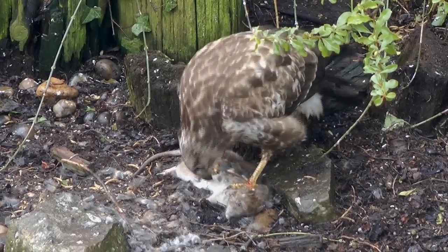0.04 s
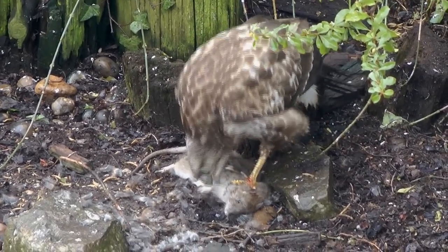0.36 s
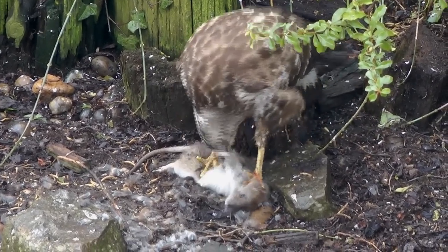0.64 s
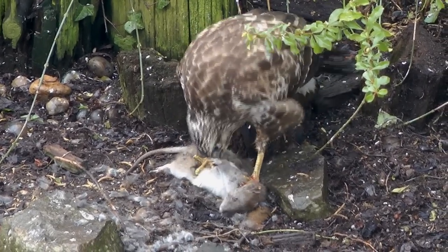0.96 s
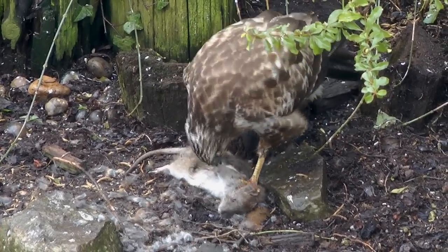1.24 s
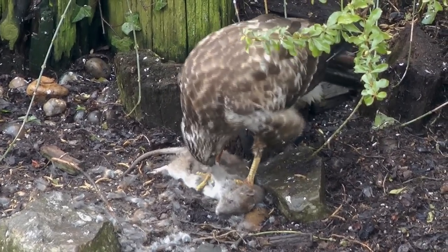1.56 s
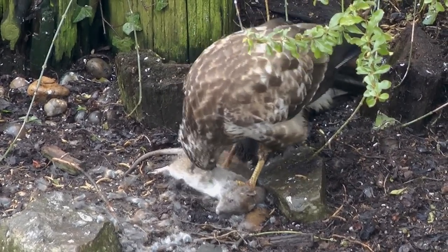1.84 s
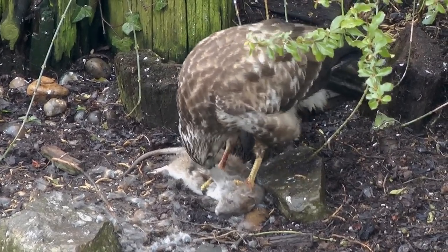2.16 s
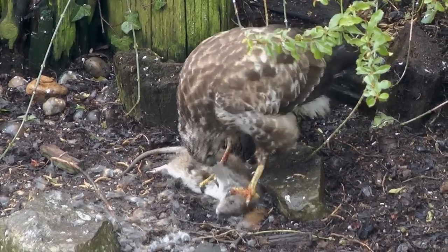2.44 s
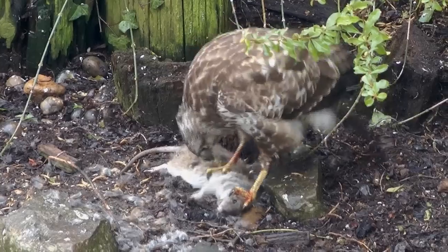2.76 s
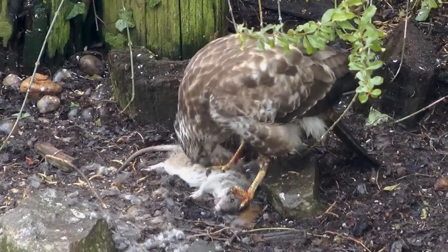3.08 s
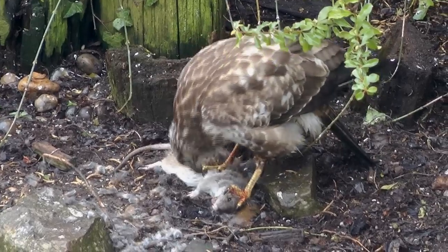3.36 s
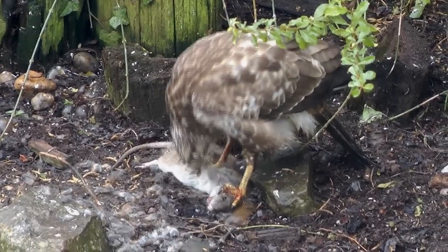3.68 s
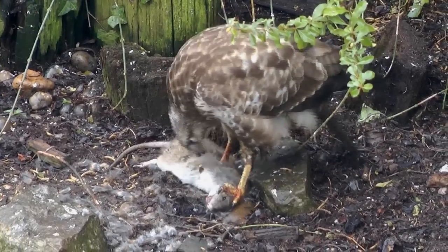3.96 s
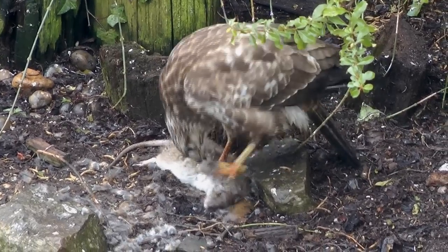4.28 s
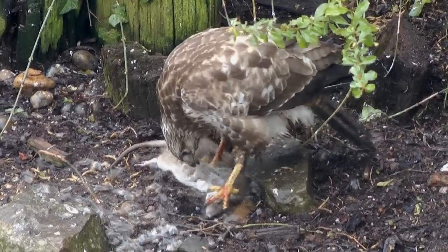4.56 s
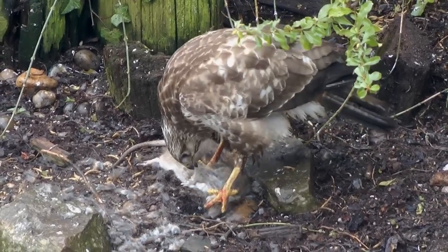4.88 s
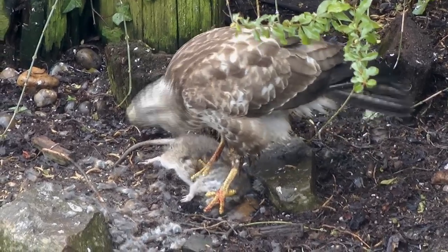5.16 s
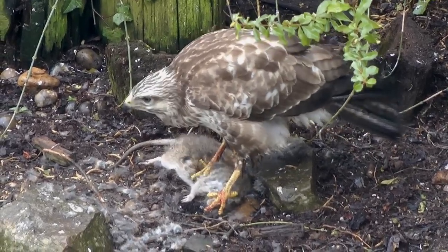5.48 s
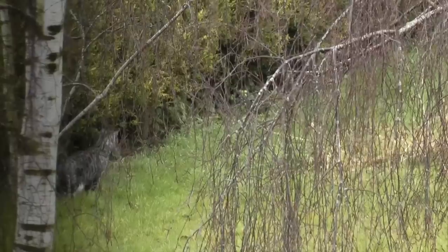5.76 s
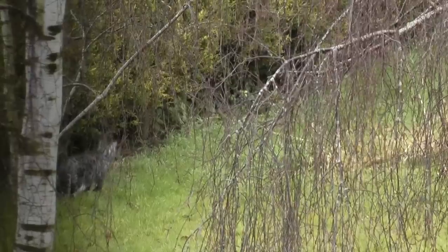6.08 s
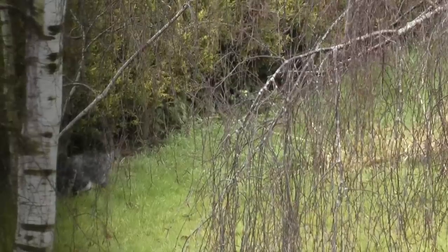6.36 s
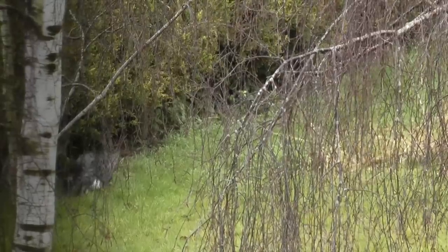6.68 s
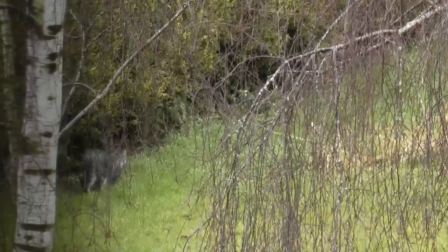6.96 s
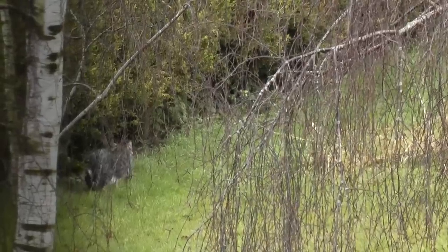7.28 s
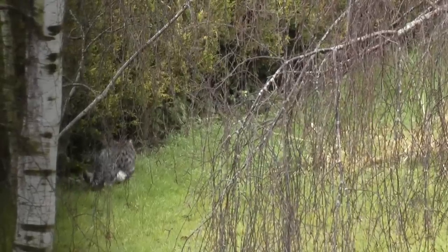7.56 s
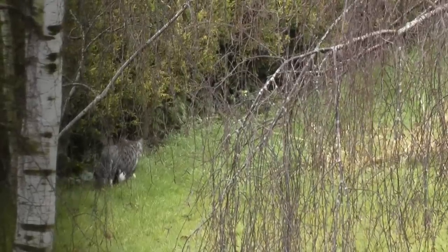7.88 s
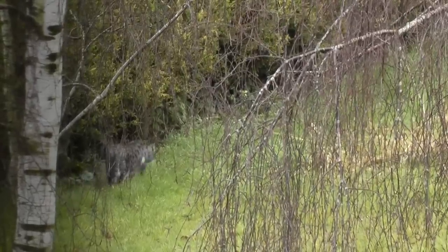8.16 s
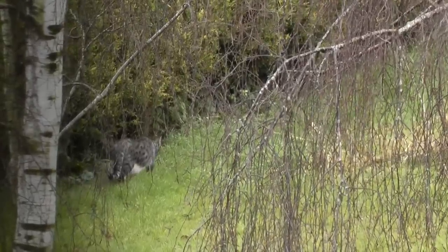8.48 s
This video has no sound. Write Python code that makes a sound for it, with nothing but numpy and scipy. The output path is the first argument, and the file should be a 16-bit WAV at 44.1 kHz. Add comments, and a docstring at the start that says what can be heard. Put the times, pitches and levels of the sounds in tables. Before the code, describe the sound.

A small songbird close to the microphone sings quick, bright, sweeping whistles for the first few seconds, while a second bird adds a brief high rasping note. The near song stops, and farther birds carry on with thin chirps, trills and a short flurry of falling notes. A low murmur of distant traffic and a faint hiss run underneath in the garden, with a soft microphone bump and two tiny dry clicks.

```python
"""A near songbird whistles sweeping phrases in a garden, often with both sides of its syrinx at once.
A second bird adds a high rasping loop; others answer from the trees over a low murmur of far traffic.
Each side of a syrinx is an oscillator that gives a nearly pure tone of gliding pitch.
Fences reflect the song and foliage scatters it into reverberation.
There is one soft bump on the microphone, and two short dry clicks."""
import sys
import numpy as np
from scipy import signal
from scipy.fft import rfft, irfft
from scipy.io import wavfile
from scipy.ndimage import uniform_filter1d

SR = 44100
rng = np.random.default_rng(int(sys.argv[2]) if len(sys.argv) > 2 else 0)


def master_out(mix):
    """Clip the mix to full scale and print it as 16-bit PCM to the path in sys.argv[1]."""
    frames = np.transpose(np.atleast_2d(mix))
    ceiling = np.clip(frames, -1, 1)
    pcm = np.round(ceiling * 32767).astype(np.int16)
    wavfile.write(sys.argv[1], SR, pcm)


N = 380583
TIME = np.arange(N) / SR


def from_db(db):
    """Amplitude ratio of a level in decibels."""
    return 10 ** (np.asarray(db) / 20)


def pan(left_db):
    """Level difference between the ears: left and right gains."""
    return from_db(np.array([[left_db], [-left_db]]) / 2)


def at_hz(points, hz):
    """Interpolation of a spectrum on a log-frequency axis."""
    point_hz, value = np.transpose(points)
    return np.interp(np.log(hz + 1), np.log(point_hz), value)


def add(track, start_s, sound):
    """Superposition: a sound joins the track at its moment."""
    i = int(np.clip(start_s * SR, 0, N))
    track[i:i + len(sound)] += sound[:N - i]


def drift(n, per_s):
    """Random modulation: straight lines between Gaussian values."""
    knots = rng.standard_normal(400)
    return np.interp(np.arange(n) * per_s / SR, np.arange(len(knots)), knots)


# Likeness of left and right in the open air: frequency_hz, correlation
COHERENCE = [(60,1),(280,0.76),(700,0.82),(6000,.8),(12000,1)]
def air_noise(spectrum):
    """Partial coherence: mid and side noise form a coloured stereo field of unit power."""
    hz = np.arange(N // 2 + 1) * SR / N
    mid, side = rfft(rng.standard_normal((2, N)))
    alike = np.clip(at_hz(COHERENCE, hz), 0, 1)
    stereo = np.sqrt(1 + alike) * mid + np.sqrt(1 - alike) * side * [[1], [-1]]
    roll_off = 1 + (hz / spectrum[-1][0] / 2) ** 4
    noise = irfft(from_db(at_hz(spectrum, hz)) / roll_off * stereo, N)
    return noise / np.sqrt(np.mean(noise ** 2))


# Spectra of far traffic and of open-air hiss: frequency_hz, relative_density_db
TRAFFIC_SPECTRUM = [(30,-7),(45,-15),(70,3),(90,-8),(150,0),(205,-7.5),(300,-8.5),(420,-16),(600,-10.5),(770,-5.5),(950,-9.5),(1300,-12),(1600,-17.5),(2000,-18),(5000,-52)]
HISS_SPECTRUM = [(3000,20),(6000,10.5),(9500,3),(13000,7)]
def traffic_and_air():
    """Stationary noise: a low murmur of traffic under a fainter hiss."""
    return from_db(-54.5) * air_noise(TRAFFIC_SPECTRUM) + from_db(-62.5) * air_noise(HISS_SPECTRUM)


# Tones of far machinery: pitch_hz, level_db
HUM_TONES = [(71,-73.5),(490,-74.5)]
def machinery_hum():
    """Slow amplitude and frequency modulation makes two faint tones wander."""
    out = np.zeros(N)
    for hz, db in HUM_TONES:
        amplitude = np.sqrt(2) * from_db(db + 2 * drift(N, 4.4))
        cycles = np.cumsum(hz + 1.2 * drift(N, 3.1)) / SR
        out += amplitude * np.sin(2 * np.pi * cycles)
    return out


# Envelope of the bump: time_s, level_db
BUMP_ENVELOPE = [(2.99,-43.5),(3.015,-47.5),(3.33,-58),(3.45,-57)]
# Its spectrum: frequency_hz, relative_density_db
BUMP_SPECTRUM = [(25,-4),(60,-6),(120,2),(200,-26),(500,-17)]
def microphone_bump():
    """A soft impact puts its energy in the bass: a fading burst of low noise."""
    level_db = np.interp(TIME, *np.transpose(BUMP_ENVELOPE), left=-np.inf, right=-np.inf)
    return from_db(level_db) * air_noise(BUMP_SPECTRUM)


# Two short dry clicks: start_s, peak_db
CLICKS = [(1.858,-33.5),(6.072,-31.5)]
# Their tones: frequency_hz, relative_level_db, t60_s
CLICK_TONES = [(1990,4,0.011),(4350,3,0.018),(10300,7.5,0.0014)]
def clicks():
    """Exponential decay: each click dies away in a few milliseconds."""
    out, t = np.zeros(N), TIME[:SR // 20]
    click = sum(from_db(db - 60 * t / t60) * np.sin(2 * np.pi * hz * t) for hz, db, t60 in CLICK_TONES)
    for start_s, peak_db in CLICKS:
        add(out, start_s, from_db(peak_db) * click / np.abs(click).max())
    return out


def foliage(x, wet_db, t60_s):
    """Scattering by leaves and branches leaves a dying stereo tail that loses its treble first."""
    mid, side = rng.standard_normal((2, SR))
    noise = mid + side * [[1], [-1]] / 3
    dull = signal.sosfilt(signal.butter(2, 4600, fs=SR, output="sos"), noise)
    fade = from_db(-60 * TIME[:SR] / t60_s)
    tail = fade * (dull + (noise - dull) * fade)
    tail /= np.sqrt(np.sum(tail ** 2) / 2)
    return from_db(wet_db) * signal.fftconvolve(np.atleast_2d(x), tail, axes=1)[:, :N]


# Echoes from ground, fence and house: delay_s, gain_db, left_minus_right_db
ECHO_PATHS = [(.011,-10.5,-1.5),(0.041,-18.5,5),(0.118,-20.5,1)]
def reflections(x):
    """Reflection from rough surfaces is half specular and crisp, half diffuse and smeared."""
    specular = sum(pan(left_db) * from_db(db) * np.interp(TIME - delay_s, TIME, x, left=0)
                   for delay_s, db, left_db in ECHO_PATHS)
    return (specular + foliage(specular, wet_db=0, t60_s=.04)) / np.sqrt(2)


def whistle(hz, level_db, edge_s, waver, flutter_db):
    """Oscillation of one side of a syrinx: an unsteady near sine whose faint octave grows with pitch."""
    n = len(hz)
    t = np.arange(n) / SR
    phase = 2 * np.pi * np.cumsum(hz * (1 + waver * drift(n, 600))) / SR
    gate = np.sin(np.pi / 2 * np.clip(np.minimum(t, t[-1] - t) / edge_s, 0, 1)) ** 2
    octave_db = -56 + 28 * np.log2(np.minimum(hz, 7500) / 4000)
    amplitude = np.sqrt(2) * gate * from_db(level_db + flutter_db * drift(n, 200))
    return amplitude * (np.sin(phase) + from_db(octave_db) * np.sin(2 * phase))


def arc(length_s, start_hz, middle_hz, end_hz):
    """Parabolic glide through three pitches."""
    progress = np.linspace(0, 1, max(int(length_s * SR), 64))
    return np.polyval(np.polyfit([0, .5, 1], [start_hz, middle_hz, end_hz], 2), progress)


def settle(length_s, final_hz, offset_octaves, time_constants=3):
    """Exponential relaxation: a pitch starts off its mark and eases onto it."""
    remaining = np.exp(-time_constants * np.linspace(0, 1, max(int(length_s * SR), 64)))
    return final_hz * 2 ** (offset_octaves * (remaining - remaining[-1]))


def hoarseness(pitch):
    """Roughness grows as the root of the octaves spanned per second; held whistles are pure."""
    return np.sqrt(np.ptp(np.log2(pitch)) * SR / len(pitch))


def chorus(count=440, centre_hz=4450, rise_octaves=.0503):
    """Incoherent summation: faint glides of many distant birds overlap at random times and pitches."""
    out = np.zeros(N)
    for k, (when, length, height, register, loud, *bends) in enumerate(rng.uniform(-1, 1, (count, 8))):
        octaves = .34 * (height + register) + rise_octaves * np.array([-1, 0, 1]) + .22 * np.array(bends)
        pitch = arc(.05 * 2 ** length, *(centre_hz * 2 ** octaves))
        note = whistle(pitch, -67 + 3 * loud, edge_s=.0079, waver=.018, flutter_db=7)
        add(out, (k + when) / count * N / SR, note)
    return out


# High trills: start_s, length_s, start_hz, middle_hz, end_hz, level_db, depth_hz, rate_hz
TRILL_NOTES = [ (0.154,0.46,6290,6810,6840,-53.5,245,51), (0.826,0.24,8520,8680,8260,-57,119,76),
               (1.374,0.041,3250,2974,2710,-40.5,513,150), (0.96,0.11,7010,6840,6850,-46.5,362,53),
               (1.967,0.084,6230,7270,5820,-47.5,570,32), (2.605,0.047,3050,2884,2500,-47,330,190),
               (4.611,0.17,7610,7020,6790,-53.5,597,92), (4.84,0.12,6830,6590,6740,-43.5,444,124),
               (8.104,0.39,6640,6980,6800,-61.5,248,29)]
def trills():
    """Frequency modulation shakes thin notes unevenly up and down."""
    out = np.zeros(N)
    for start_s, length_s, start_hz, middle_hz, end_hz, db, depth_hz, rate_hz in TRILL_NOTES:
        carrier = arc(length_s, start_hz, middle_hz, end_hz)
        cycles = np.cumsum(rate_hz * (1 + .3 * drift(len(carrier), rate_hz))) / SR
        pitch = carrier + depth_hz * np.sin(2 * np.pi * cycles)
        add(out, start_s, whistle(pitch, db, edge_s=.014, waver=.0053, flutter_db=4))
    return out


# Harsh twittering: start_s, length_s, centre_hz, level_db
TWITTER_RUNS = [(2.082,0.016,5660,-40.5),(4.331,0.086,5920,-51),(6.641,0.45,5820,-53.5),(7.763,0.083,6530,-60)]
def twitters(rate_hz=55, span_octaves=.65):
    """Sawtooth modulation of pitch gives a quick uneven run of steep downward flicks."""
    out = np.zeros(N)
    for start_s, length_s, centre_hz, db in TWITTER_RUNS:
        flick = np.cumsum(rate_hz * 2 ** (drift(int(length_s * SR), rate_hz) / 2)) / SR % 1
        pitch = centre_hz * 2 ** (span_octaves * (.5 - flick))
        tone = whistle(pitch, db, edge_s=.006, waver=.08, flutter_db=4)
        add(out, start_s, np.sin(np.pi * flick) * tone)
    return out


def chirps(notes, fade_db_per_octave=6):
    """Level follows frequency: each call from the trees is strongest at its median pitch."""
    out = np.zeros(N)
    for start_s, pitch, db in notes:
        level = db - fade_db_per_octave * np.abs(np.log2(pitch / np.median(pitch)))
        add(out, start_s, whistle(pitch, level, edge_s=.011, waver=.011 * hoarseness(pitch), flutter_db=3))
    return out


# Whistles that sink or climb onto their pitch: start_s, length_s, final_hz, level_db
SINKING_CALLS = [ (0,0.14,6570,-48.5), (3.836,0.11,7730,-59), (3.865,0.043,3467,-50.5),
                 (3.956,0.095,2910,-60), (3.963,0.14,7130,-56.5), (4.154,0.087,5100,-56.5),
                 (4.176,0.1,6680,-48.5), (4.675,0.18,6230,-50), (4.971,0.035,6420,-35.5),
                 (5.641,0.052,4406,-35), (6.089,0.18,5760,-57), (6.17,0.012,3530,-38),
                 (7.337,0.088,5140,-53), (7.946,0.13,6720,-59.5), (8.46,0.12,3346,-58.5)]
CLIMBING_CALLS = [ (1.352,0.24,8214,-55), (2.521,0.2,7790,-55), (2.696,0.052,5010,-52),
                  (2.89,0.24,7960,-57), (3.06,0.082,5380,-53), (3.506,0.28,3640,-62), (4.986,0.18,7860,-52),
                  (5.403,0.046,5040,-39.5), (5.436,0.01,6500,-30), (6.98,0.069,4470,-51.5),
                  (7.087,0.055,5180,-47), (7.168,0.19,7720,-60.5), (7.473,0.064,5340,-56),
                  (8.212,0.2,3700,-65.5), (8.604,0.028,4500,-38.5)]
# Short arched peeps: start_s, top_hz, level_db
PEEP_CALLS = [(0.508,5270,-48.5),(4.029,9070,-54),(4.218,9050,-60),(5.473,7960,-50.5)]
def thin_calls(offset_octaves=.13, peep_s=.036, foot_ratio=.81):
    """Frequency glides: whistles relax onto a pitch from above or below, and peeps rise and fall."""
    notes = [(s, settle(length, hz, offset_octaves), db) for s, length, hz, db in SINKING_CALLS]
    notes += [(s, settle(length, hz, -offset_octaves), db) for s, length, hz, db in CLIMBING_CALLS]
    notes += [(s, arc(peep_s, foot_ratio * hz, hz, foot_ratio * hz), db) for s, hz, db in PEEP_CALLS]
    return chirps(notes)


# Hoarse sweeps, most of them downward: start_s, length_s, start_hz, end_hz, level_db
SWEEP_CALLS = [ (3.127,0.045,2670,4200,-55), (3.169,.07,4150,2560,-55), (4.35,0.071,4910,3840,-45),
               (5.22,0.06,5780,4710,-37.5), (5.25,0.09,4860,2830,-50.5), (5.29,0.047,5630,4330,-39),
               (5.343,0.02,4560,3480,-34.5), (5.371,0.07,4730,2444,-52.5), (5.556,0.035,6670,4110,-38.5),
               (5.597,0.036,5830,4190,-46), (5.705,0.018,5980,5040,-36), (5.746,0.052,5770,2680,-49),
               (6.804,0.039,4160,2640,-53.5), (7.414,0.073,4030,4810,-49), (7.562,0.062,3960,2290,-57),
               (8.379,0.061,5670,3780,-53)]
def sweeps(bow_ratio=1.0357):
    """Reverberation deep in the trees runs bowed sweeps together into a cascade."""
    notes = []
    for start_s, length_s, start_hz, end_hz, db in SWEEP_CALLS:
        middle_hz = bow_ratio * np.sqrt(start_hz * end_hz)
        notes.append((start_s, arc(length_s, start_hz, middle_hz, end_hz), db))
    direct = chirps(notes)
    scattered = foliage(direct, wet_db=-2.5, t60_s=.25) + foliage(direct, wet_db=-4, t60_s=.9)
    return from_db(-4) * direct + scattered


# The near songbird's low warble and a second bird's high rasping loop: time_s, pitch_hz, level_db
LOW_WARBLE = [(0.12, 5220, -33.5), (0.128, 5180, -37), (0.136, 3820, -23), (0.144, 5160, -31),
              (0.158, 4320, -22), (0.164, 5370, -34), (0.172, 4020, -24.5), (0.182, 4770, -24.5),
              (0.2, 4720, -19.5), (0.212, 4570, -31.5), (0.224, 3373, -24), (0.255, 4110, -30)]
HIGH_LOOP = [(0.612, 8670, -49), (0.63, 6690, -37.5), (0.65, 6520, -28.5), (0.664, 9740, -64.5),
             (0.678, 9460, -54), (0.692, 6900, -31.5), (0.704, 6650, -25), (0.764, 6760, -23.5),
             (0.786, 7830, -42.5), (0.806, 7440, -46.5), (0.816, 6700, -28.5), (0.822, 6030, -83)]
def flourish(points, waver, rasp_db, edge_s=.007, glide_s=.0014, rasp_ratio=.85):
    """Biphonation: one side of the syrinx whistles an unbroken figure while the other rasps below it."""
    out = np.zeros(N)
    time_s, hz, db = np.transpose(points)
    t = np.arange(time_s[0] - edge_s / 2, time_s[-1] + edge_s, 1 / SR)
    pitch = uniform_filter1d(np.interp(t, time_s, hz), int(glide_s * SR))
    level = np.interp(t, time_s, db)
    add(out, t[0], whistle(pitch, level, edge_s, waver, flutter_db=2.5))
    add(out, t[0], whistle(rasp_ratio * pitch, level + rasp_db, edge_s, waver=.11, flutter_db=-5))
    return out


# The near songbird; overlapping notes come from the two sides of its syrinx, # and the row at 1.946 s is a
# faint echo of the phrase at 1.84 s, arriving 0.118 s later: # start_s, length_s, entry_hz, held_hz, exit_hz,
# level_db, swell_db
SONG_NOTES = [ (0,0.046,2810,3090,3400,-46.5,-8), (0.034,0.028,5750,4950,5900,-35,11),
              (0.06,0.012,5300,3790,2800,-25.5,1.5), (0.32,0.016,4390,4310,4420,-30.5,-4.5),
              (0.364,0.12,5065,4410,4120,-41,-14.5), (0.396,0.072,4220,4080,3880,-43,-19.5),
              (0.583,0.043,8370,7600,7600,-43.5,6), (0.607,0.04,8100,4740,4750,-41,12.5),
              (0.652,0.06,7600,3850,3600,-46.5,-17.5), (0.762,0.061,5200,6500,5730,-36,3),
              (1.039,0.045,4530,4460,3560,-22.5,-19), (1.074,0.044,6550,4570,4400,-31,6.5),
              (1.075,0.026,3400,2400,2130,-50,-11.5), (1.119,0.028,3850,3414,3390,-19.5,7),
              (1.15,0.042,3040,2420,1760,-41,-13), (1.153,0.038,4950,4414,2700,-25,0),
              (1.2,0.078,3380,3310,2950,-31,-3.5), (1.201,0.076,2730,2642,2440,-34,-5),
              (1.38,0.042,4000,4060,3660,-29.5,10.5), (1.417,0.039,2530,2160,1850,-44.5,-14),
              (1.442,0.031,4180,3340,2900,-29.5,2), (1.541,0.012,2960,3820,5030,-20.5,-0.5),
              (1.551,0.022,2716,3597,2990,-20,3.5), (1.588,.042,3040,3240,2790,-29.5,1.5),
              (1.573,0.015,3160,2975,3120,-23,0.5), (1.619,0.031,5120,4420,3500,-38.5,19),
              (1.646,0.064,2300,2747,2250,-34.5,-1.5), (1.835,0.017,3980,3746,3630,-26,3.5),
              (1.842,0.025,2640,3276,2850,-24.5,11), (1.864,0.058,2944,2832,3100,-32,-5),
              (1.868,0.055,3570,3290,3690,-33.5,-11), (1.946,0.14,3480,3150,3030,-45.5,-1),
              (2.172,0.064,2985,3178,2935,-24.5,7.5), (2.288,0.09,2583,2616,2663,-28.5,8),
              (2.394,0.076,3343,3260,2944,-27,6), (2.486,0.021,3080,3040,3060,-27,2),
              (2.554,0.039,3690,3580,3620,-43,-7), (2.59,0.066,3467,3410,3190,-34.5,-16)]
def near_song(edge_s=.007, glide_power=1.4, breath_arch_db=.5, detune_db_per_octave=6):
    """Resonance: the throat is tuned to each held pitch, so the glides in and out are softer."""
    out = np.zeros(N)
    for start_s, length_s, entry_hz, held_hz, exit_hz, db, swell_db in SONG_NOTES:
        position = np.linspace(-1, 1, int((length_s + edge_s) * SR))   # 0 is the middle of the note
        outer_hz = np.where(position < 0, entry_hz, exit_hz)
        pitch = held_hz + (outer_hz - held_hz) * np.abs(position) ** glide_power
        breath_db = db + swell_db * position / 2 - breath_arch_db * position ** 2
        level = breath_db - detune_db_per_octave * np.abs(np.log2(pitch / held_hz))
        note = whistle(pitch, level, edge_s, waver=.0078 * hoarseness(pitch), flutter_db=1.97)
        add(out, start_s - edge_s / 2, note)
    return out


def scene():
    """The direct-to-reverberant ratio falls with distance; twigs at each perch add a short blur."""
    song = near_song() + flourish(LOW_WARBLE, waver=.014, rasp_db=-32)
    loop = flourish(HIGH_LOOP, waver=.022, rasp_db=-17)
    near_birds = song + loop
    answers = trills() + thin_calls() + twitters()
    crowd = chorus()
    near_birds_tail = foliage(near_birds, wet_db=-18.5, t60_s=.64)
    near_birds_tail += foliage(near_birds, wet_db=-10, t60_s=.045)
    near = pan(1.1) * song + pan(2.3) * loop + reflections(near_birds) + near_birds_tail
    answer_tail = foliage(answers, wet_db=-5, t60_s=.073) + foliage(answers, wet_db=-3, t60_s=1)
    far = from_db(-1.5) * answers + answer_tail + sweeps()
    distant = from_db(-2) * crowd + foliage(crowd, wet_db=-1.5, t60_s=.7)
    background = machinery_hum() + microphone_bump() + traffic_and_air()
    return pan(1.8) * background + clicks() + distant + pan(2.4) * far + near


def record(dry):
    """Band limiting: the microphone sheds the deepest bass, and the top is cut steeply."""
    high_pass = signal.butter(2, 32, "high", fs=SR, output="sos")
    low_pass = signal.ellip(10, .1, 60, 15650, fs=SR, output="sos")
    return signal.sosfiltfilt(low_pass, signal.sosfilt(high_pass, dry))


dry = scene()
out = record(dry)
master_out(out)
```